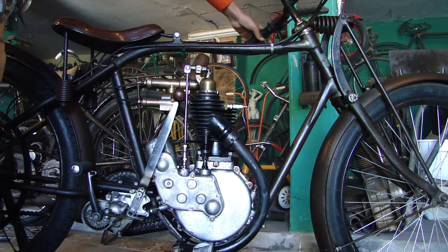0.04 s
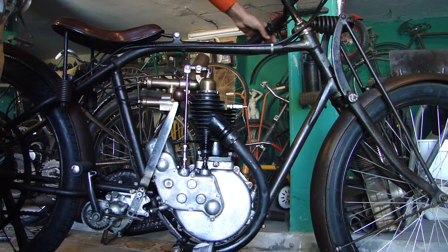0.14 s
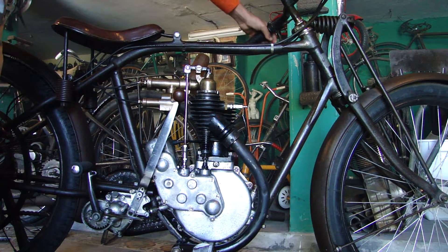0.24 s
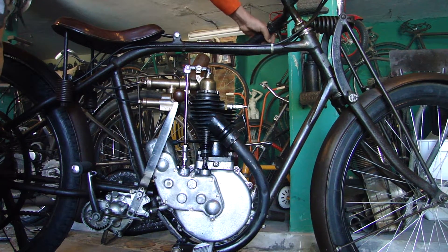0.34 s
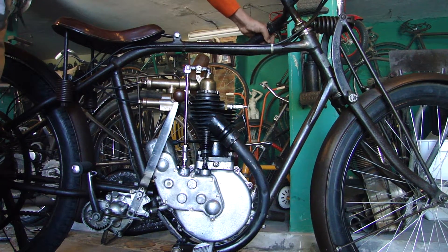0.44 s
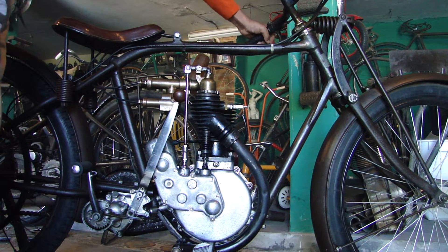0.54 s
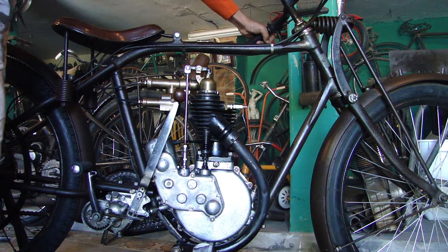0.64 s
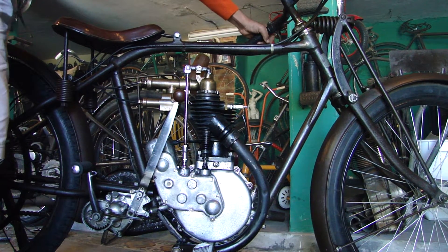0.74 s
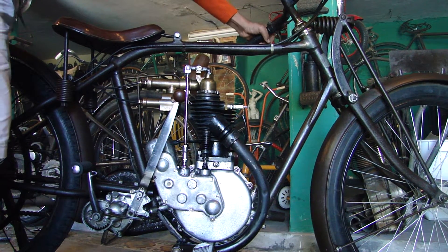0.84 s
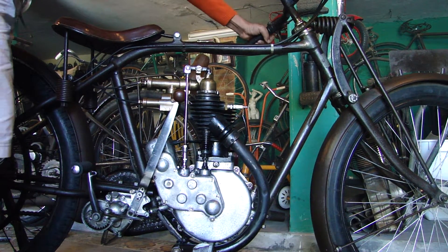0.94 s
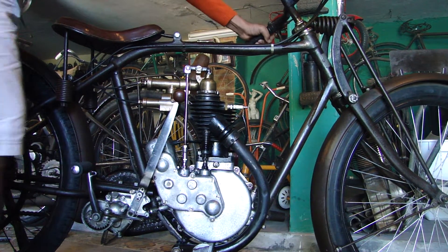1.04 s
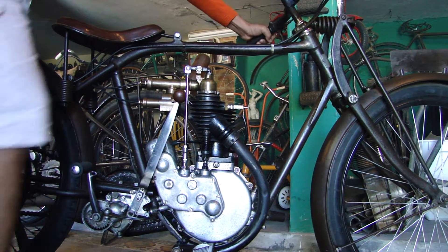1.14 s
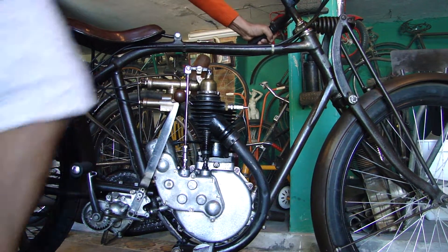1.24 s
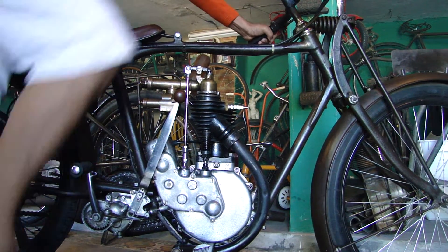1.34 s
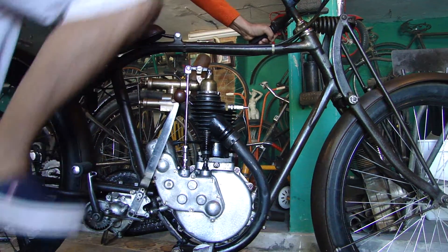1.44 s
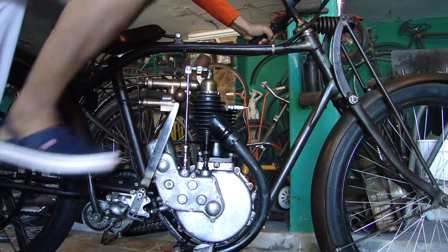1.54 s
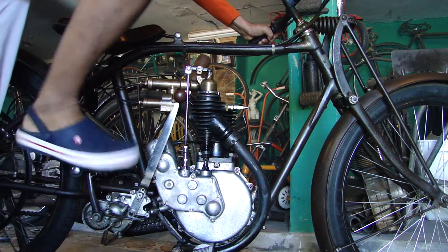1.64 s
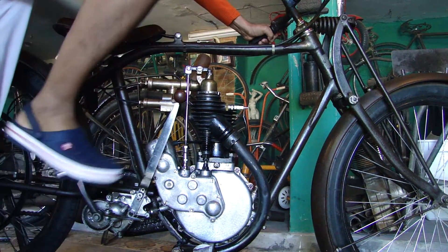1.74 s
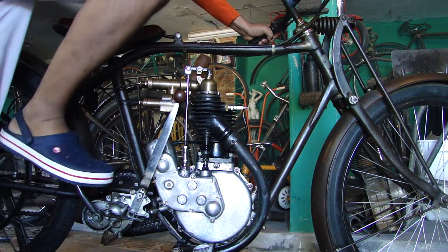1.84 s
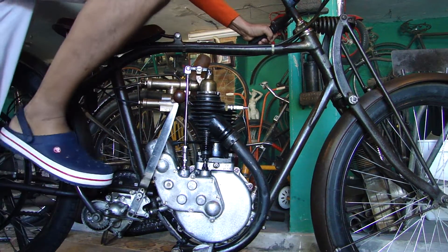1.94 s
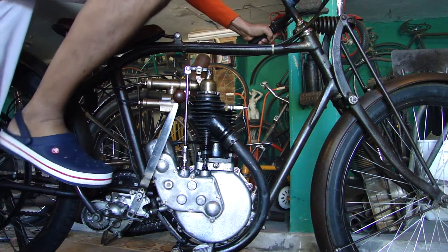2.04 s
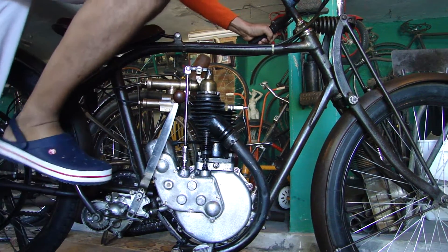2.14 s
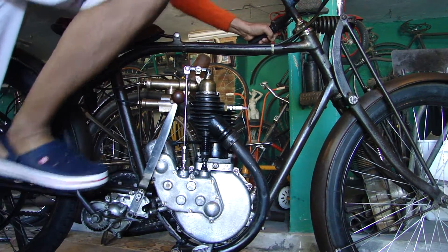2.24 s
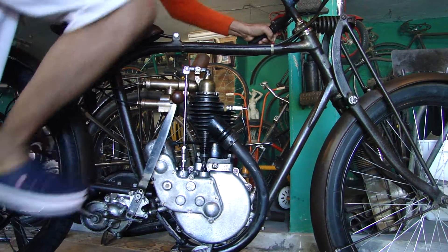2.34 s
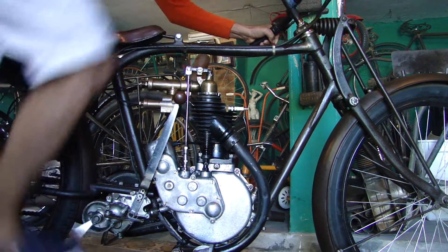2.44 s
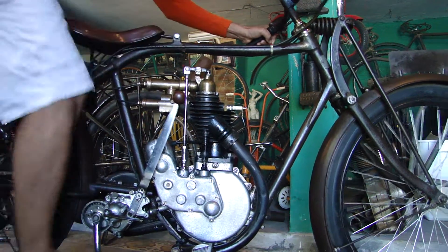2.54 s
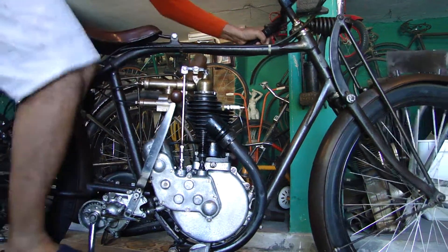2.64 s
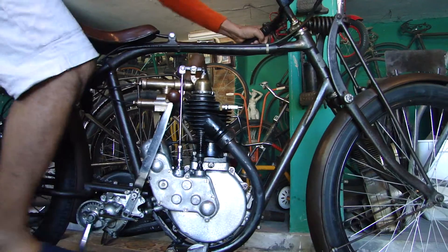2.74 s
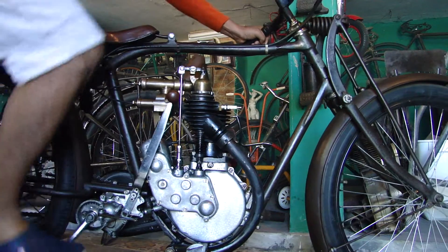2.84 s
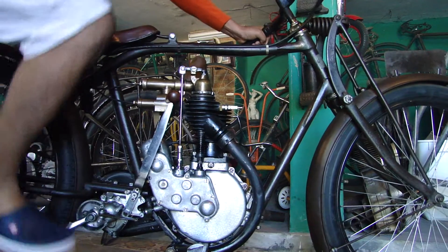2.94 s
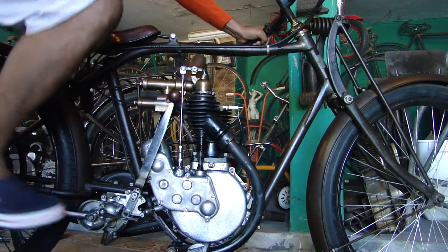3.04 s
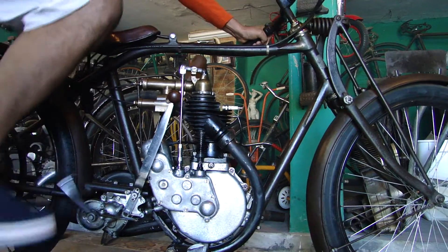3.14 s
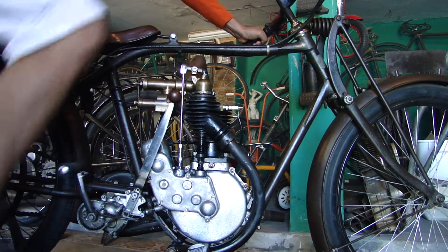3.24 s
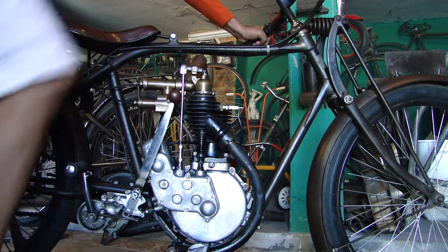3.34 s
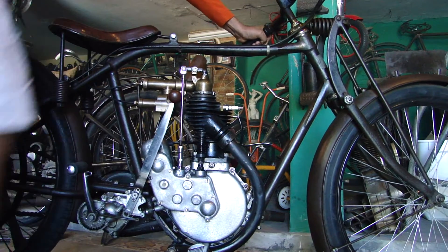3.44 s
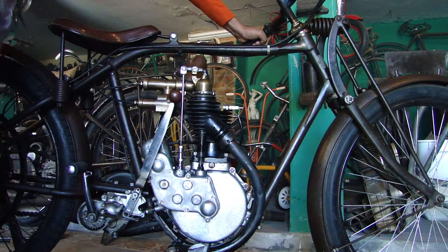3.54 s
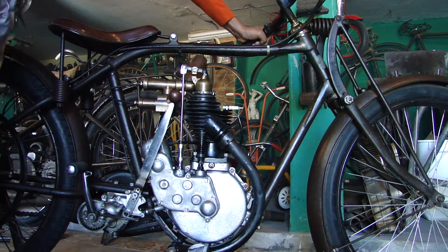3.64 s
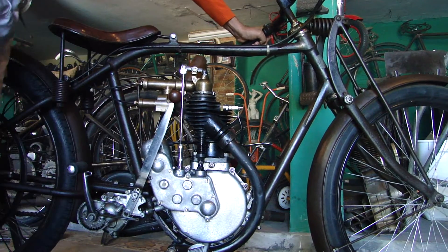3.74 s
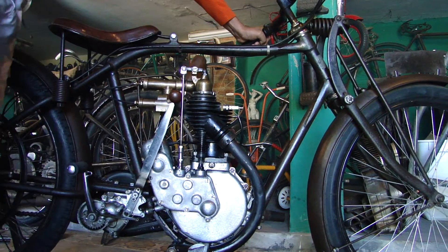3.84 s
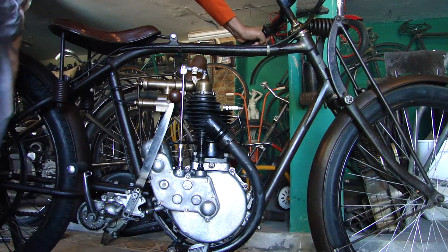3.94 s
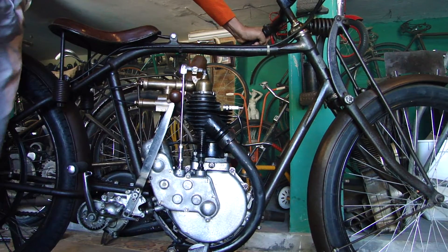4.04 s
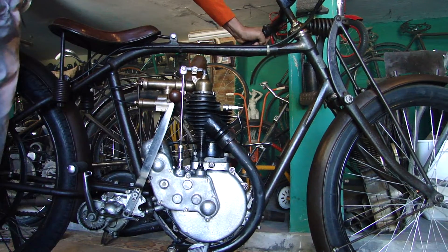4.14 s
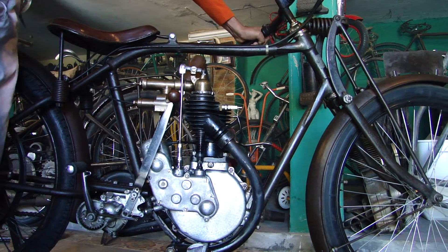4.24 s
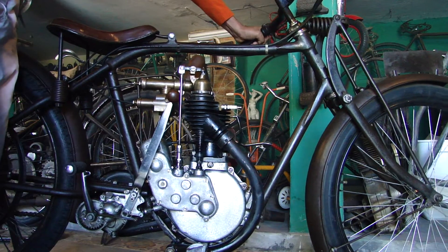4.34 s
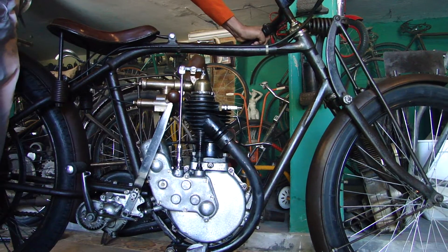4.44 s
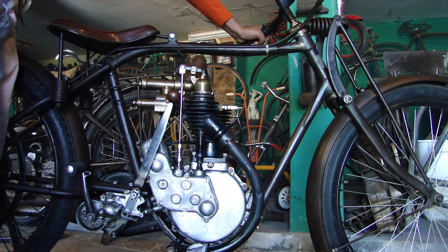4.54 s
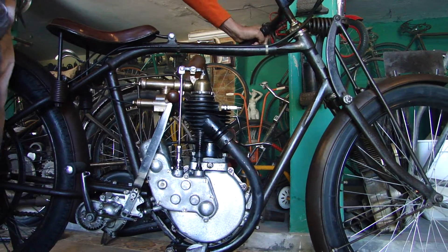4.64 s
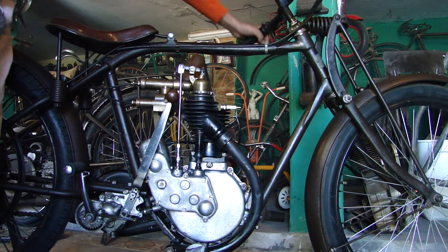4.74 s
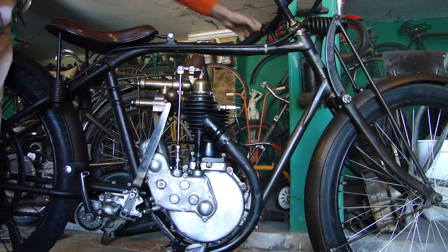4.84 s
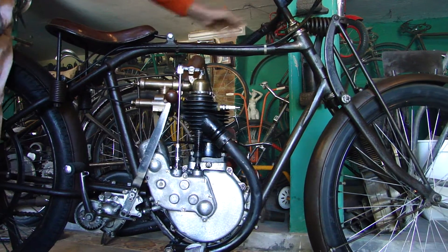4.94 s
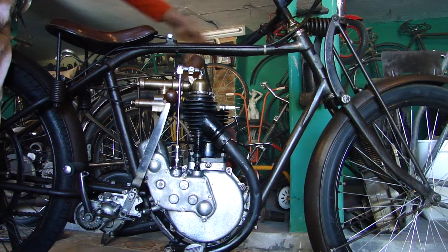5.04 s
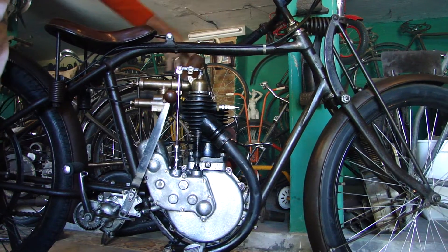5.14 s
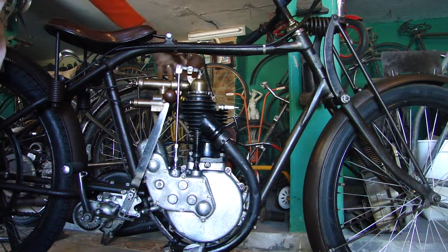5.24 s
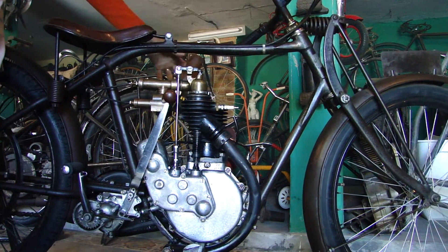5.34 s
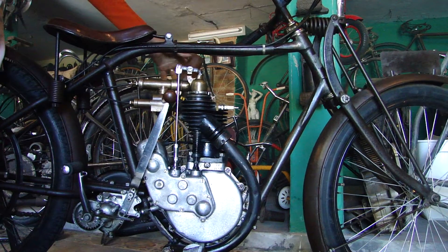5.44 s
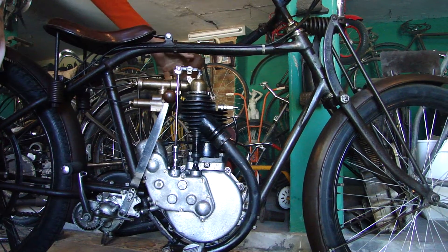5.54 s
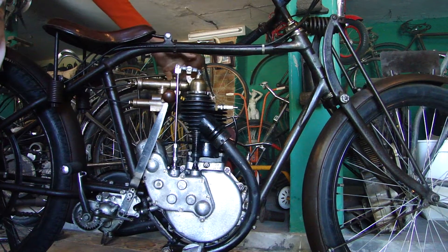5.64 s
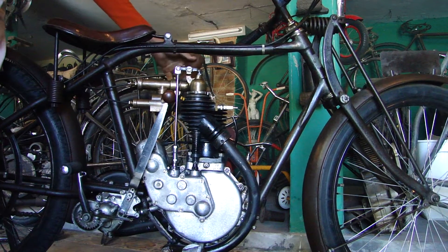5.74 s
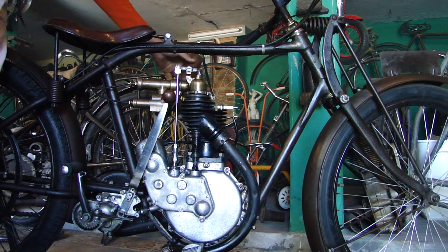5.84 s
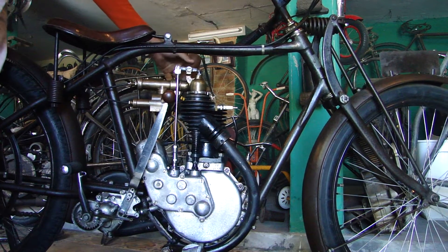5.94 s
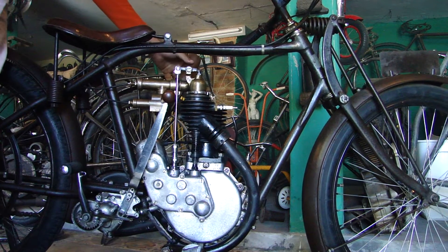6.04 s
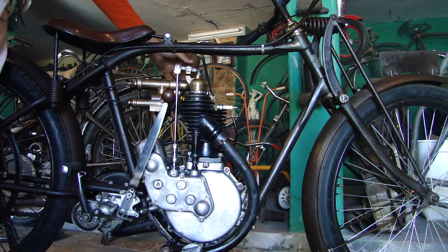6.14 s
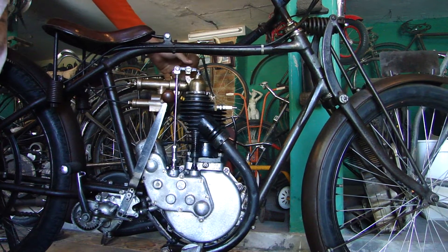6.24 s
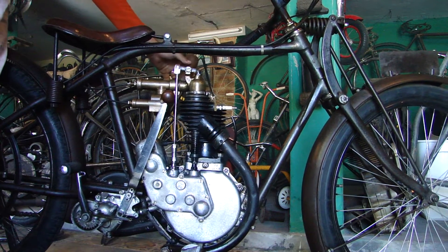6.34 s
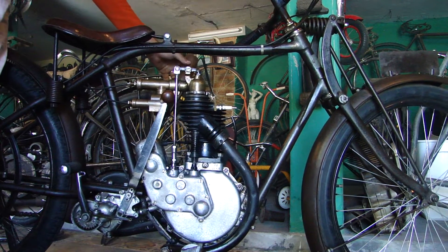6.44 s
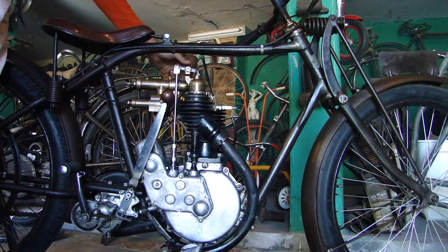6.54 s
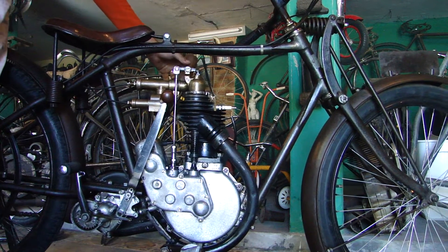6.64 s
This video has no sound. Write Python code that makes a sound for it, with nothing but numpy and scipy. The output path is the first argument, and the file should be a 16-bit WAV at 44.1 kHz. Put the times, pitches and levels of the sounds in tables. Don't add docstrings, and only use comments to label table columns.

```python
import sys
import numpy as np
from scipy import signal
from scipy.fft import rfft, irfft, next_fast_len
from scipy.io import wavfile

SR = 44100
rng = np.random.default_rng(int(sys.argv[2]) if len(sys.argv) > 2 else 0)


def persist_wave(psi):
    counts = np.round(np.clip(psi, -1, 1) * 32767).astype(np.int16)
    wavfile.write(sys.argv[1], SR, np.atleast_2d(counts).T)


def rack_gain(trim_db):
    fader = np.asarray(trim_db, float)
    return 10 ** (fader / 20)


N = 295470
T = np.arange(N) / SR

# f/Hz, level/dB
AIR_COLOUR = [(18, -70), (30, -39), (180, -16.5), (244, -16.5), (270, -12), (474, -11.5), (628, -6.5),
              (696, -13.5), (791, -10.5), (10500, -29.5), (13500, -45)]
# t/s of peak, level/dB, fall/s
HUM_SWELLS = [(0.005, -56, 0.04), (0.482, -47, 0.082), (0.748, -51, 0.09), (0.928, -51, 0.025),
              (0.996, -56, 0.02), (1.092, -66, 0.04), (1.184, -63, 0.017), (1.382, -52.5, 0.12),
              (1.65, -65, 0.1)]
# t/s of peak, level/dB, rise/s, fall/s
RUSTLES = [
    (0.136, -51, 0.036, 0.052),
    (1.082, -55, 0.02, 0.03),
    (1.2, -48.5, 0.062, 0.042),
    (1.38, -49.5, 0.11, 0.12),
    (1.52, -47.5, 0.087, 0.21),
]
# f/Hz, level/dB per Hz
CLOTH_COLOUR = [(120, -48), (200, -21), (566, -11), (618, -14), (750, -13.5), (1230, -9.5), (10700, -20),
                (13500, -27)]
# t/s, peak level/dB, left minus right/dB, contact/s
KNOCKS = [
    (0.47, -13.5, 2, 0.02),
    (1.683, -33, -2, 0.012),
    (1.775, -15.5, 1, 0.017),
    (1.99, -25.5, -1, 0.0091),
]
# f/Hz, level/dB, time to fall 60 dB/s
KNOCK_RINGS = [
    [(1250, 1, 0.037), (1764, -5.5, 0.25), (2115, -8.5, 0.34), (2450, -14, .15), (3150, 1, .08),
     (3700, -6, 0.15)],
    [(2250, 5, 0.049)],
    [(3670, 2, 0.079), (549, -11.5, 0.43), (867, -10, 0.17), (1077, -8, 0.091), (1440, -6, 0.092),
     (2280, 4, 0.031)],
    [(1470, -7, 0.36), (2030, -7, 0.27), (3100, -15, .1), (4080, -4, 0.066), (4530, -8, 0.17)],
]
# f/Hz, level/dB per Hz
KNOCK_COLOURS = [
    [(200, -29), (700, -6.5), (1300, -8), (3200, -1), (4500, -7), (6500, -23), (11000, -22), (13000, -53)],
    [(200, -14.5), (500, -2), (1100, -3), (1800, -11), (4000, -16), (13000, -45)],
    [(100, -16), (400, -6.5), (1000, -0.5), (2400, -9), (4000, -8.5), (5000, -18.5), (11000, -25),
     (13000, -31)],
    [(300, -25), (800, -8.5), (1800, -10), (4000, -11.5), (8000, -21), (13000, -27)],
]
KNOCK_SLIDES = [0.08, 0.96, 0.086, 0.38]
# t/s, peak level/dB, f/Hz
TEETH = [(2.164, -24, 1470), (2.19, -29, 332), (2.229, -20, 817), (2.274, -20, 4470), (2.282, -20, 536),
         (2.295, -8.5, 3880), (2.325, -11, 2300), (2.343, -8, 1250), (2.37, -3, 1250), (2.384, -17, 4300),
         (2.396, 2.5, 4170), (2.405, -0.5, 4540), (2.41, -3, 2260), (2.477, -4, 1390), (2.495, -3, 2050),
         (2.513, -1, 905), (2.773, 2, 2080), (2.914, -10, 2680), (5.352, 2, 2050), (5.375, -5, 2064)]
# t/s, level/dB
KICK_EFFORT = [(2.13, -64.5), (2.17, -49), (2.288, -37.5), (2.296, -29), (2.354, -31), (2.4, -17.5),
               (2.53, -16), (2.552, -37), (2.56, -39)]
# f/Hz, width/Hz, level/dB
GEAR_RINGS = [(1250, 250, 3.5), (2120, 340, 0), (1610, 300, 0.5)]
# f/Hz, width/Hz, level/dB
CASING = [(1380, 90, -7), (1700, 66, 1), (2080, 270, 4), (2390, 480, 0), (2850, 850, -4), (3390, 510, -4),
          (4010, 750, 4.5)]
# f/Hz, level/dB per Hz
CLATTER_COLOUR = [(60, -23), (110, 5.5), (200, -7), (600, -1.5), (1200, -8), (2400, -9.5), (4100, -14.5),
                  (5600, -13.5), (11000, -24), (12800, -42), (13500, -75)]
# t/s, crack level/dB, thump level/dB, sizzle against crack/dB
FIRINGS = [(2.544, 0.5, -21, 0), (2.674, -1.5, -34, 1), (2.76, 1.5, -26, -13), (2.854, -2, -24.5, -1),
           (3.033, 0, -27.5, 4), (3.287, 1, -22, -5), (3.534, 4.5, -19, -16), (3.69, 3.5, -20, -11),
           (3.844, 0.5, -19, -11), (3.991, 4, -20.5, -16), (4.138, -1.5, -21, -8), (4.357, 0, -20.5, -9.5),
           (4.571, 4, -18.5, -21), (4.71, 4.5, -18.5, -18), (4.924, 3, -19, -17), (5.134, 1.5, -23, -7),
           (5.345, 1.5, -22, -10.5), (5.482, 3.5, -20, -11), (5.618, 1.5, -21.5, -17),
           (5.824, 4, -20.5, -12), (5.96, 2, -19.5, -11), (6.1, 1, -25, -6), (6.237, 1, -23, -9.5),
           (6.442, 1, -22, -12), (6.65, 2.5, -19, -15)]
FIRE_S, CRACK_DB, THUMP_DB, SIZZLE_DB = np.transpose(FIRINGS)
# f/Hz, level/dB, time to fall 60 dB/s
BOOM_RINGS = [(93, -2, 0.21), (112.7, -10, 0.22), (142.2, -7.5, 0.31), (161.6, -9, 0.15), (193.8, 12, 0.13),
              (217, 3, 0.21), (279.9, -3.5, 0.26), (313.7, -13, 0.52), (498.4, -2.5, 0.25),
              (539.3, -2, 0.24), (618.7, -5.5, 0.21), (779, -2, 0.15)]
# f/Hz, width/Hz, level/dB
FINS = [(3310, 430, 5.5), (5070, 570, 10.5), (5300, 200, -3.5), (8070, 200, 6), (9760, 870, 12.5),
        (10770, 280, 10.5)]
# f/Hz, level/dB per Hz
CRACK_COLOUR = [(350, -21.5), (650, -3), (1250, 6), (2300, -3), (3500, 5), (5500, -6), (11200, -7),
                (13500, -27.5)]
# delay t/s, level/dB
WALLS = [
    (0.013, -16),
    (0.042, -9),
]
# f/Hz, time to fall 60 dB/s
ROOM_RING = [(100, 0.55), (500, 0.38), (2000, 0.37), (5000, 0.34), (11000, 0.39)]
# f/Hz, left-right correlation
LIKENESS = [(100, 0.72), (300, 0.53), (700, 0.18), (2000, 0.1), (8000, -0.13)]
# f/Hz, left minus right/dB
PORTS = [(60, 1), (200, 9), (600, 7), (2000, 4), (8000, 1.5)]

CYCLE_S = 0.075
CATCH_S, CATCH_RISE_S, SETTLE_S = 2.53, 0.11, 0.28


def on_log(hz, table):
    table = np.array(table, float)
    return np.interp(np.log(np.maximum(hz, 1)), np.log(table[:, 0]), table[:, 1])


def convolve(x, response):
    return signal.oaconvolve(x, response, axes=-1)[..., :N]


def colour(x, table):
    size = 2048
    cepstrum = irfft(np.log(rack_gain(on_log(np.arange(size + 1) * SR / 2 / size, table))))
    cepstrum[1:size] *= 2
    cepstrum[size + 1:] = 0
    response = irfft(np.exp(rfft(cepstrum)))
    return convolve(x, np.broadcast_to(response, x.shape[:-1] + (2 * size,)))


def band(x, lo_hz, hi_hz):
    return signal.sosfilt(signal.butter(2, [lo_hz, hi_hz], "band", fs=SR, output="sos"), x)


def resonate(x, peaks):
    return sum(rack_gain(db) * signal.lfilter(*signal.iirpeak(hz, hz / width, SR), x) for hz, width, db in peaks)


def unit(x):
    return x / np.sqrt(np.mean(x ** 2))


def pair(size):
    fast = 2 * next_fast_len(size // 2 + 1)
    mid, side = rfft(rng.standard_normal((2, fast)))
    alike = np.clip(on_log(np.arange(len(mid)) * SR / fast, LIKENESS), -0.99, 0.99)
    sign = np.array([[1], [-1]])
    both = mid * np.sqrt(1 + alike) + side * np.sqrt(1 - alike) * sign
    return irfft(both / np.sqrt(2), fast)[:, :size]


def spikes(times, db):
    out = np.full(N, 1e-18)
    np.add.at(out, np.clip((np.asarray(times) * SR).astype(int), 0, N - 1), rack_gain(db))
    return out


def ring(modes, rise_s):
    t = T[:SR // 2]
    tones = 0
    for (hz, db, t60), phase in zip(modes, rng.uniform(0, 2 * np.pi, len(modes))):
        tones = tones + rack_gain(db) * np.sin(2 * np.pi * hz * t + phase) * 1000 ** (-t / t60)
    return tones * (1 - np.exp(-(t / rise_s) ** 2))


def taps(share, spread_db, bed):
    size = rack_gain(spread_db * np.minimum(rng.exponential(1, N), 3))
    return pair(N) * (bed + (rng.random(N) < share) * size)


def crunch(shape, evenness):
    spectrum = rfft(rng.standard_normal(len(shape)) * shape)
    out = irfft(spectrum / np.abs(spectrum) ** evenness, len(shape)) * (shape > 0.01 * shape.max())
    return out / np.max(np.abs(out))


def patchy(rate, spread_db):
    s = np.arange(int(N / SR * rate) + 2) / rate
    return rack_gain(spread_db * np.interp(T, s, rng.standard_normal(len(s))))


def swells(times, db, rise_s, fall_s):
    since = T - np.reshape(times, (-1, 1))
    width = np.where(since < 0, np.reshape(rise_s, (-1, 1)), np.reshape(fall_s, (-1, 1)))
    return rack_gain(np.asarray(db)) @ np.exp(-(since / width) ** 2)


def shiver(times, db, fade_s, parts, scatter_db):
    chance_db = scatter_db * rng.standard_normal((len(times), len(parts))).T
    noise, fade = pair(N), [1, -np.exp(-1 / SR / fade_s)]
    out = 0
    for part_db, part in zip(chance_db, parts):
        shake = signal.lfilter([1], fade, spikes(times, db + part_db))
        out = out + shake * resonate(noise, [part]) * np.sqrt(SR / part[1] / np.pi)
    return out


def pan(x, pan_db):
    return x * rack_gain(np.array([pan_db, -pan_db]) / 2).reshape(2, -1)


def room(x, wet_db, gap_s=0.0013):
    t, noise, tail = T[:SR // 2], pair(SR // 2), 0
    for hz in 90 * 2.0 ** np.arange(8):
        tail = tail + band(noise, hz / np.sqrt(2), hz * np.sqrt(2)) * 1000 ** (-t / on_log(hz, ROOM_RING))
    tail = tail * (1 - np.exp(-(t / gap_s) ** 2))
    tail = tail / np.sqrt(np.mean(np.sum(tail ** 2, axis=1)))
    return x + rack_gain(wet_db) * convolve(x.mean(axis=0)[None], tail)


def air():
    return unit(colour(pair(N), AIR_COLOUR)) * rack_gain(-52)


def outside_hum():
    s, db, fall_s = np.transpose(HUM_SWELLS)
    tone = unit(resonate(rng.standard_normal(N), [(598, 47, 0)]))
    return tone * swells(s, db, 0.022, fall_s)


def rustle():
    grain = 1 + (rng.random(N) < 0.01) * rack_gain(2.5 * rng.exponential(1, N))
    return unit(colour(pair(N) * grain, CLOTH_COLOUR)) * swells(*np.transpose(RUSTLES)) * rack_gain(2.5)


def knocks():
    contact, ringing, t = 0, 0, T[:SR // 2]
    rows = zip(KNOCKS, KNOCK_SLIDES, KNOCK_RINGS, KNOCK_COLOURS)
    for (s, peak_db, pan_db, contact_s), slide, modes, tone in rows:
        shape = np.exp(-t / contact_s) + slide * np.exp(-(t / 0.067) ** 4)
        scrape = colour(crunch(shape, 0.62), tone)[:len(t)]
        hit = spikes([s], peak_db)
        contact = contact + pan(convolve(hit, scrape / np.max(np.abs(scrape))), pan_db + 3)
        ringing = ringing + pan(convolve(hit, 0.29 * ring(modes, 0.0011)), pan_db + 10)
    return room(band(contact, 140, 11300), wet_db=5) + ringing


def gear_teeth():
    out, t = spikes([], []), T[:1500]
    for s, peak_db, hz in TEETH:
        tone = 0.5 * np.sin(2 * np.pi * hz * t) * 1000 ** (-t / 0.062)
        edge = band(rng.standard_normal(len(t)), 0.5 * hz, 2 * hz) * 1000 ** (-t / 0.0017)
        start = int(s * SR)
        out[start:start + len(t)] += rack_gain(peak_db - 7.5) * (tone + edge)
    return out


def gear_whirr():
    effort_db = np.interp(T, *np.transpose(KICK_EFFORT), left=-90, right=-90)
    slack_db = -16 - effort_db
    grind = taps(0.012, 2.2, 0.4)
    rasp = band(grind, 1780, 4450) + 0.63 * resonate(grind, [(4300, 800, 0)])
    growl = band(band(grind, 424, 760), 370, 830) + 0.28 * band(band(grind, 180, 420), 180, 380)
    hiss = band(band(grind, 4100, 11400), 4300, 12000)
    whirr = unit(resonate(grind, GEAR_RINGS))
    whirr = whirr + rack_gain(-0.5 - 0.54 * slack_db) * unit(rasp)
    whirr = whirr + rack_gain(-12.5 + 0.42 * slack_db) * unit(growl)
    whirr = whirr + rack_gain(-16 - 0.67 * slack_db) * unit(hiss)
    return whirr * rack_gain(effort_db - 1.5)


def starter():
    return room(pan(gear_teeth(), 3.3) + gear_whirr(), wet_db=-2.5)


def crank():
    turns = np.cumsum(np.maximum(np.round(np.diff(FIRE_S) / CYCLE_S), 1))
    times = np.r_[FIRE_S[0] - 3 * CYCLE_S, FIRE_S, FIRE_S[-1] + 2 * CYCLE_S]
    return np.interp(T, times, np.r_[-1, 0, turns, turns[-1] + 2])


def catch(t):
    since = t - CATCH_S - CATCH_RISE_S
    rise = np.clip(1 + since / CATCH_RISE_S, 0, 1)
    return np.where(since < 0, rise, np.exp(-np.maximum(since, 0) / SETTLE_S))


def first_bangs(t):
    return catch(t + CATCH_RISE_S)


def valves(cycles):
    vigour = catch(T)
    clatter_db = np.where(T < CATCH_S, -90, -25.5 + 2.5 * vigour)
    body_db, treble_db = -4.5 + 2 * vigour, 7.13 + 2.5 * vigour
    since = (cycles - 0.08) % 1
    busy = 0.6 + 0.95 * (1 - np.exp(-since / 0.043)) * np.exp(-(since / 2.3) ** 2)
    metal = unit(colour(taps(0.04, 0.94, 0.36), CLATTER_COLOUR))
    rings = sum(patchy(25, 3.4) * resonate(metal, [part]) for part in CASING)
    mix = band(metal, 867, 2130) * busy ** 0.49
    mix = mix + (band(metal, 2320, 6080) + 0.96 * rings) * busy
    mix = mix + rack_gain(body_db) * band(metal, 117, 1230)
    mix = mix + rack_gain(treble_db) * band(metal, 4820, 14300) * busy ** 0.17
    landings = T[1:][(np.diff(np.floor(cycles - 0.12)) > 0) & (T[1:] > CATCH_S)]
    mix = mix + shiver(landings, -10.5, 0.018, CASING[1:], scatter_db=6)
    return room(mix * rack_gain(clatter_db + 1.5), wet_db=-3.5)


def thump(bangs, puffs, scatter_db):
    t = T[:2048]
    pulse = np.sin(2 * np.pi * 330 * t - 1.6) * np.exp(-((t - 0.0016) / 0.0017) ** 2)
    pulses = convolve(bangs + spikes(puffs, -10 + scatter_db), pulse)
    return room(pan(rack_gain(-10) * pulses, 0.82), wet_db=-7, gap_s=0.015)


def boom(bangs, puffs, scatter_db):
    pushes = bangs + spikes(puffs, -6 + 3 * catch(puffs) + scatter_db)
    return rack_gain(-20.5) * convolve(pushes, ring(BOOM_RINGS, 0.018)) * rack_gain(2 * first_bangs(T))


def chuff():
    breath = unit(band(pair(N), 404, 752))
    return breath * swells(FIRE_S + 0.028, THUMP_DB - 4, 0.027, 0.082) * patchy(40, 2.6)


def fins():
    db = CRACK_DB - 15.5 + 5 * first_bangs(FIRE_S) + 2.5 * np.minimum(SIZZLE_DB, -8)
    return shiver(FIRE_S + 0.0014, db, 0.036, FINS, scatter_db=0)


def crack():
    t = T[:2048]
    snap = np.sin(2 * np.pi * 1200 * t) * np.exp(-((t - 0.003) / 0.00076) ** 2)
    tick = np.sin(2 * np.pi * 3500 * t) * np.exp(-((t - 0.003) / 0.00038) ** 2)
    blast = np.exp(-((t - 0.0025) / 0.0021) ** 4) + 0.21 * np.exp(-t / 0.051) * (t > 0.002)
    left, right, both = np.zeros((3, N + len(t)))
    for start in (FIRE_S * SR).astype(int):
        for port in (left, right, both):
            port[start:start + len(t)] += crunch(blast, 1)
    gas = colour(np.array([left, right])[:, :N] + 1.23 * both[:N], CRACK_COLOUR)
    gas = gas / np.percentile(np.abs(gas), 99.9)
    sizzle_db = np.interp(T, FIRE_S - 0.01, SIZZLE_DB + 7)
    sizzle = band(gas[0], 4400, 13200) * np.array([[1], [-1]]) * rack_gain(0.5 * sizzle_db)
    out = (gas + 0.82 * sizzle) * rack_gain(np.interp(T, FIRE_S - 0.01, CRACK_DB))
    out = out + 0.42 * convolve(spikes(FIRE_S, CRACK_DB), snap)
    out = out + rack_gain(-10.5) * convolve(spikes(FIRE_S, CRACK_DB + 14 * first_bangs(FIRE_S)), tick)
    out = out + convolve(out, spikes(*np.transpose(WALLS))[None, :4096])
    pan_db = 4 + 0.38 * np.interp(T, FIRE_S, SIZZLE_DB)
    return room(rack_gain(-4.5) * pan(out, pan_db), wet_db=-2, gap_s=0.0014)


def exhaust(cycles):
    puffs = T[1:][(np.diff(np.floor(cycles)) > 0) & (cycles[1:] > 0.5)]
    scatter_db = 2 * rng.standard_normal(len(puffs))
    bangs = spikes(FIRE_S, THUMP_DB + 18)
    low = thump(bangs, puffs, scatter_db) + boom(bangs, puffs, scatter_db)
    return low + chuff() + fins() + crack()


def scene():
    cycles = crank()
    quiet = air() + outside_hum() + rustle()
    return quiet + knocks() + starter() + valves(cycles) + exhaust(cycles)


def low_pass(x):
    return signal.sosfilt(signal.butter(12, 13910, fs=SR, output="sos"), x)


def record(dry):
    left = colour(dry[0], [(hz, db / 2) for hz, db in PORTS])
    right = colour(dry[1], [(hz, -db / 2) for hz, db in PORTS])
    low_cut = signal.butter(3, 80, "high", fs=SR, output="sos")
    cut = signal.sosfilt(low_cut, np.array([left, right]))
    return low_pass(np.tanh(1.005 * cut) / 1.208)


dry = scene()
out = record(dry)
persist_wave(out)
```